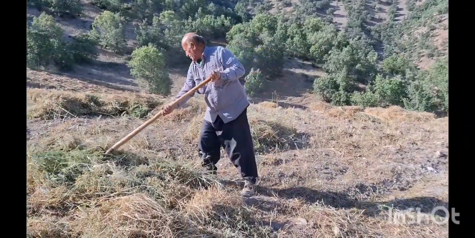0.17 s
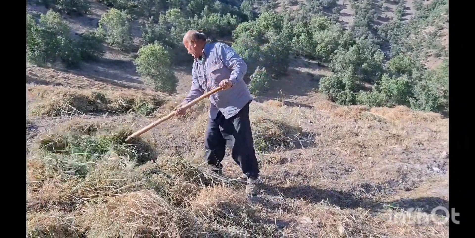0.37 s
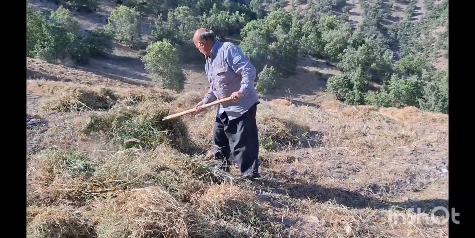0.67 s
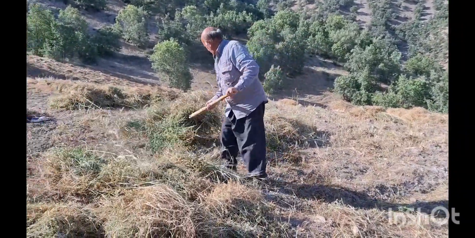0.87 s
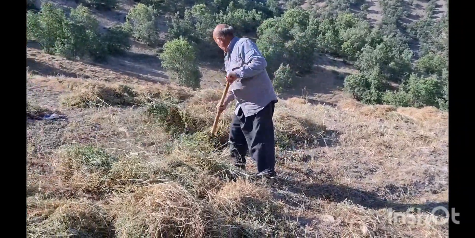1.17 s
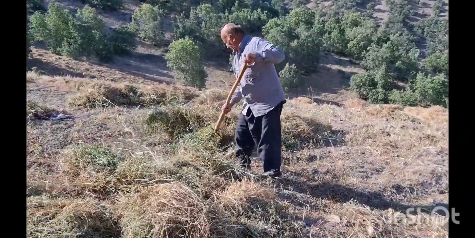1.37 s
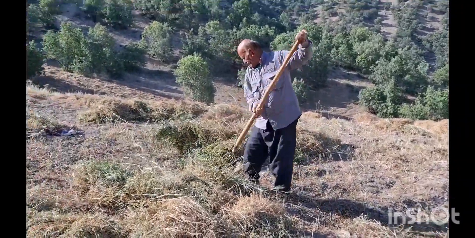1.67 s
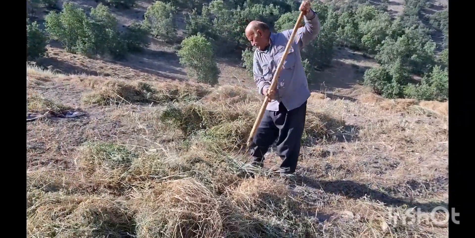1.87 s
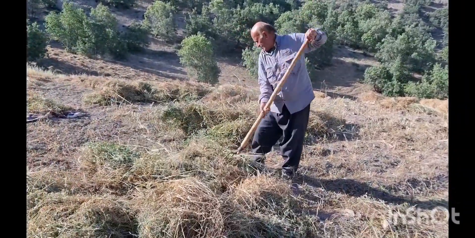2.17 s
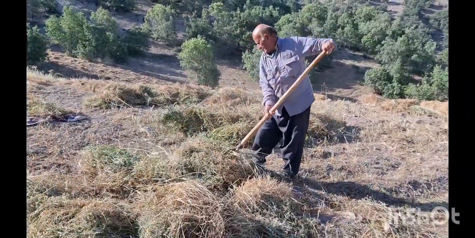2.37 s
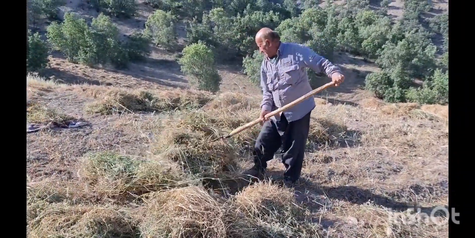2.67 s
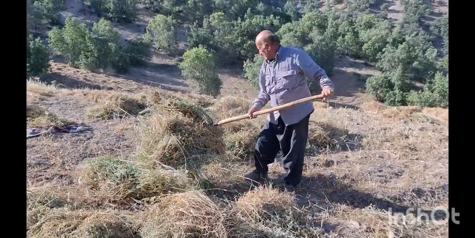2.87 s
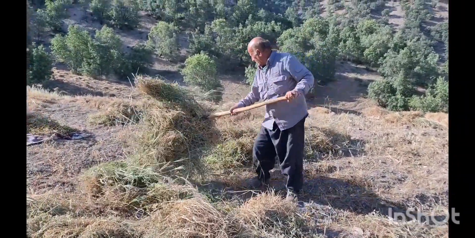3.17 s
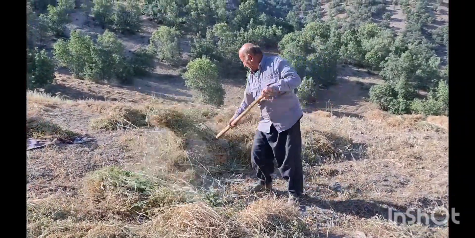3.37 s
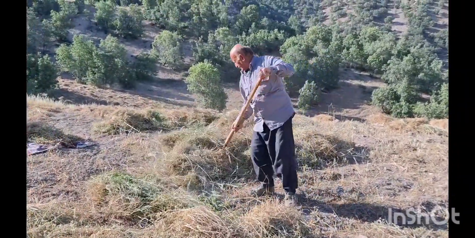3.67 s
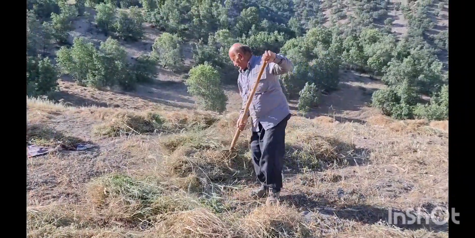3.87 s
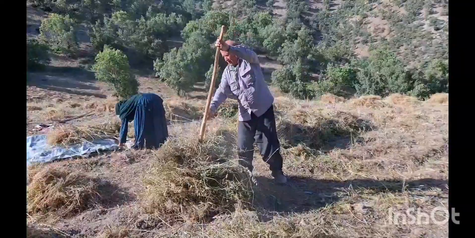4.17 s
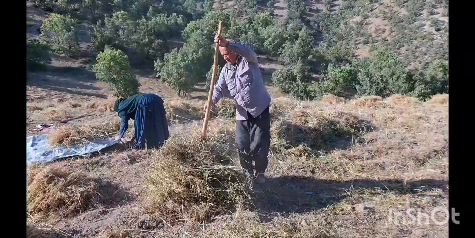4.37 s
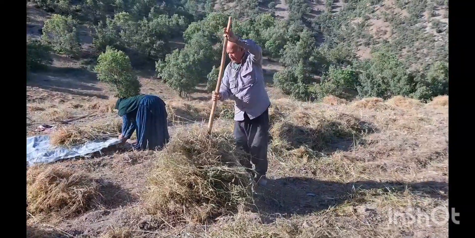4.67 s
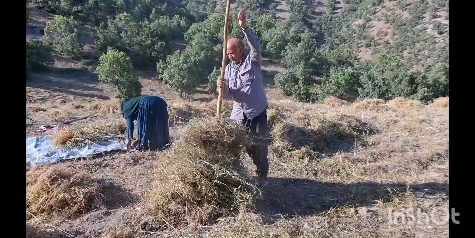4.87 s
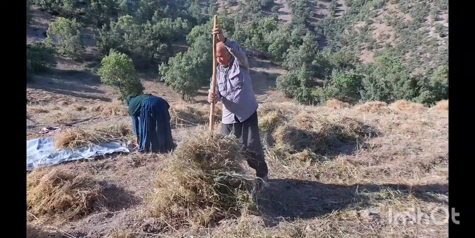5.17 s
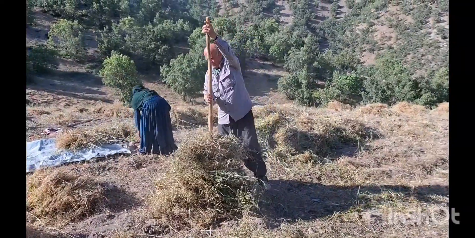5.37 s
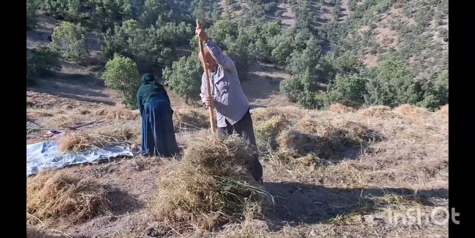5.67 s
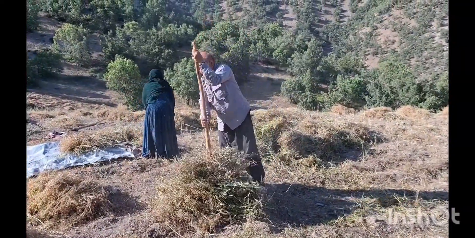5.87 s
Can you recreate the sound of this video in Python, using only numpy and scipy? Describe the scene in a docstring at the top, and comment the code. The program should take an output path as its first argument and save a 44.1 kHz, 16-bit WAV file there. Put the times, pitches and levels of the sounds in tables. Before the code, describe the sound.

A fork sweeps and tosses dry hay in crisp, bright rustling swishes with snapping stems, a brief stony clink, then quieter pokes after a cut.

```python
"""Open hillside: a fork drags, lifts and tosses dry hay a few metres from a hand-held phone, at one spot
and then, after an abrupt cut, at a second. Shaped noise broken into tiny grains makes the rustle; ticks
with a short rough ring are snapping stems. Decaying partials ring a tine on stones, sliding narrow noise
creaks as wood, and sagging tones with a gritty scuff are handle and feet thudding on soft ground or
fingers bumping the phone. A wavering wing tone passes twice, over still air and a low, lumpy stir of hay."""
import sys
import numpy as np
from scipy import signal
from scipy.fft import rfft, irfft, next_fast_len
from scipy.io import wavfile
from scipy.ndimage import uniform_filter1d

SR = 44100
rng = np.random.default_rng(int(sys.argv[2]) if len(sys.argv) > 2 else 0)


def to_wav(sig):
    """Store sig (one row per channel, or 1-D mono) as 16-bit WAV at the path in sys.argv[1].

    Samples outside -1..1 are clipped; the rate is SR.
    """
    pcm = np.clip(np.atleast_2d(sig), -1, 1) * 32767
    pcm = np.round(pcm).astype(np.int16)
    wavfile.write(sys.argv[1], SR, pcm.T)  # frames by channels


N = 264996  # length [samples]

# Still air of a quiet hillside: (frequency [Hz], relative level per Hz [dB])
AIR_COLOUR = [(15, -53), (25, -39), (42, -17.5), (70, -0.5), (222, -19), (460, -12), (498, -22),
              (1210, -22.5), (3470, -20.5), (5340, -29), (6280, -43), (9660, -22), (15700, -16)]
# Low stir of the hay, colour: (frequency [Hz], relative level per Hz [dB])
STIR_COLOUR = [(60, -34), (130, 1), (250, -1.5), (400, -3), (560, -8), (750, -46.5)]
# Low stir of the hay, swells: (time [s], level before trim [dB])
STIR_LEVEL = [(0.0, -85), (0.3, -79), (0.62, -72), (0.85, -80), (1.36, -72.5), (1.82, -81), (2.1, -75),
              (2.35, -79), (2.63, -71), (3.0, -75.5), (3.7, -72), (4.05, -92), (4.2, -75), (4.35, -80),
              (4.52, -73), (4.72, -92), (4.9, -78), (5.3, -81), (5.9, -69)]
# Two fly passes, each a list of: (time [s], wing beat [Hz], level [dB])
FLY_PASSES = [
    [(0.45, 320, -76), (0.558, 358, -72), (0.616, 372, -76), (0.68, 304, -82), (0.82, 358, -81),
     (0.9, 352, -86), (0.984, 295, -81), (1.068, 281, -93), (1.11, 309, -81), (1.175, 311, -73),
     (1.27, 257, -72), (1.4, 255, -83)],
    [(2.2, 275, -85), (2.24, 330, -80), (2.442, 313, -83), (2.48, 385, -80), (2.5, 365, -82)],
]
# Handle and feet on soft ground: (time [s], level [dB], settled pitch [Hz], left over right [dB], time scale [s])
GROUND_THUDS = [(1.422, -59, 214, -5, 0.013), (2.079, -54, 856, 3, 0.0065), (2.112, -62.5, 417, 1, 0.043),
                (2.1215, -44, 746, -1, 0.0034), (3.65, -64, 449, 7, 0.032), (4.0025, -61, 370, -14, 0.0013),
                (4.34, -69, 193, -4, .04), (4.4155, -49.5, 1450, -21, 0.0006), (4.43, -69, 496, -19, 0.016),
                (4.675, -59.5, 285, -1, 0.037), (5.02, -67, 383, 10, 0.017), (5.043, -62, 350, -1, .008),
                (5.066, -52, 407, 3, 0.0041), (5.316, -67.5, 356, -18, 0.02), (5.431, -53, 440, -1, 0.0043),
                (5.687, -65, 256, 0, 0.038), (5.74, -64, 396, 1, 0.015), (5.84, -67, 394, 1, .03)]
# Fingers on the phone: (time [s], level [dB], settled pitch [Hz], left over right [dB], time scale [s])
FINGER_BUMPS = [(1.42, -63, 60, -8, 0.023), (1.495, -63, 85, -16, 0.031), (1.524, -56, 99, -13, 0.0084),
                (2.64, -69, 57, 13, 0.025), (4.004, -55, 55.5, -25, 0.028)]
# Wood rubbing on packed stalks: (start [s], length [s], first pitch [Hz], last pitch [Hz], level [dB])
WOOD_CREAKS = [(1.07, .18, 900, 780, -63.5), (1.379, 0.16, 1350, 1173, -69), (1.497, .16, 1553, 1413, -74),
               (3.808, 0.039, 825, 800, -73), (4.817, 0.11, 960, 850, -72)]
# Partials of the ringing tine: (frequency [Hz], mean relative level [dB], 60 dB decay [s])
TINE_PARTIALS = [(1350, -3.5, 0.13), (1787, -0.5, 0.32), (1940, -8, 0.054), (2050, 2.5, 0.049),
                 (860, -15, 0.16)]
# Tine touching stones: (time [s], level before trim [dB], left over right [dB])
STONE_CONTACTS = [(3.8398, -42, -0.5), (3.8744, -38, -2), (3.9034, -30.5, -3), (3.9444, -48, -10)]
# Snapping stems: (time [s], level before trim [dB], pitch [Hz], left over right [dB])
STEM_SNAPS = [(0.103, -41, 13500, 1), (0.803, -31.5, 12700, -19), (0.8422, -34, 12940, 1),
              (1.7223, -48, 8000, 11), (1.8115, -42, 11500, 0), (1.834, -40, 13200, 7),
              (1.9114, -32, 12300, -10), (1.915, -30.5, 13300, 14), (1.9248, -35, 12300, -17),
              (2.007, -24.5, 14600, -1), (2.0544, -26.5, 8000, 6), (2.1724, -33, 13000, 4),
              (2.328, -34, 6500, -2), (2.3938, -26.5, 15100, 3), (2.5582, -27, 13500, -10),
              (2.799, -27, 14900, -14), (2.973, -28, 12500, -5), (3.0348, -26.5, 13000, -1),
              (3.4499, -28, 11700, -11), (3.465, -31, 13800, 2), (3.8286, -35, 9500, 0),
              (3.873, -29.5, 11650, -2), (4.035, -44.0, 14600, -4), (4.1552, -30, 13500, -8),
              (4.1715, -24.5, 11300, 17.5), (4.21, -30, 9000, 3), (4.5022, -43.0, 4730, -1),
              (4.8196, -36, 8200, 7), (4.9443, -41, 8350, 12), (5.3234, -34, 4200, -9),
              (5.4042, -42, 5450, 1), (5.737, -39, 14600, -3), (5.78, -36, 11800, 3)]
# Direction of the fork: (time [s], lead of the left in the treble [ms], left over right before shading [dB])
FORK_BEARING = [(0, 0.343, -13.5), (.7, 0.17, -9.5), (1.3, 0.093, -12.5), (1.8, 0.056, -7.5),
                (2.5, 0.078, -3.5), (3.2, 0.13, -4), (4.1, 0.062, -1.5), (4.2, 0.086, -4.5),
                (6.01, 0.062, -3.5)]
# The phone body shades the left microphone: (frequency [Hz], share of the left-right difference [ratio])
BODY_SHADE = [(500, -0.33), (900, 0.28), (1600, 0.92), (2600, 0.61), (4500, 0.036), (8000, -0.14),
              (11000, -0.19), (15000, .4)]
# Likeness of left and right in the rustle: (frequency [Hz], correlation [0-1])
LIKENESS = [(300, .7), (700, 0.75), (1200, 0.64), (2200, 0.69), (4500, 0.45), (8000, 0.067), (13000, 0.04)]
# Finest, brightest part of the rustle: (frequency [Hz], relative level per Hz [dB])
FIZZ_COLOUR = [(6500, -44), (11000, 1.5), (13000, 7.5), (14900, 8.5), (15500, 6.5), (15800, -0.5)]
# Crackle of the stalks: (frequency [Hz], relative level per Hz [dB])
CRACKLE_COLOUR = [(3820, -31), (6500, -7.5), (8140, -2), (9390, -3), (11000, -1), (14300, -24),
                  (22000, -120)]
# Swish of the stalks: (frequency [Hz], relative level per Hz [dB])
SWISH_COLOUR = [(1350, -37.5), (2300, -8.5), (2590, -7.5), (2960, -6.5), (4260, -0.5), (6500, -5),
                (8450, -12), (14300, -120)]
# Tines dragging through the hay at the first spot: (frequency [Hz], relative level per Hz [dB])
FIRST_SPOT_DRAG = [(330, -41), (560, -18), (642, -12), (803, -4), (1010, -8.5), (1560, -4), (1770, 0),
                   (2300, -4), (2990, -3), (5060, -120)]
# Tines dragging through the hay after the cut, at a second spot: (frequency [Hz], relative level per Hz [dB])
SECOND_SPOT_DRAG = [(330, -42), (560, -16), (623, -19), (789, -2), (1060, -6), (1160, -11), (1250, -4),
                    (1420, -8.5), (2300, -0.5), (2990, -32), (5060, -120)]
# Strokes of the fork: (full strength at [s], rise [s per 20 dB], hold [s], level [dB], sag over the hold [dB],
# fall [s per 20 dB], swish relative to the whole [dB], drag relative to the whole [dB])
FORK_STROKES = [(0.121, 0.08, 0.018, -48.0, 1.5, 0.757, -8.0, -16.0),
                (0.221, 0.115, 0.133, -38.0, -3.0, 0.649, -6.5, -19.0),
                (0.649, 0.401, 0.366, -39.0, 8.0, 0.068, -7.5, -20.0),
                (0.911, 0.095, 0.019, -48.0, 0.5, 0.1, -7.5, -19.0),
                (1.085, 0.193, 0.091, -41.0, -1.5, 0.153, -8.5, -16.0),
                (1.322, 0.166, 0.128, -51.5, 1.5, 0.269, -9.0, -11.5),
                (1.612, 0.251, 0.032, -65.5, 3.5, 0.289, -6.0, -5.5),
                (1.757, 0.048, 0.013, -63.0, 5.5, 0.041, -8.0, -8.0),
                (1.818, 0.028, 0.105, -50.0, -3.5, 0.084, -7.5, -21.5),
                (1.917, 0.056, 0.014, -44.0, 1.0, 0.248, -10.0, -22.5),
                (2.027, 0.116, 0.124, -41.0, 0.0, 0.144, -7.0, -16.5),
                (2.351, 0.322, 0.094, -52.5, -8.0, 0.8, -7.0, -17.5),
                (2.389, 0.051, 0.019, -48.0, 0.5, 0.1, -8.0, -18.0),
                (2.548, 0.366, 0.415, -38.0, 0.5, 0.726, -8.5, -18.0),
                (3.173, 0.154, 0.062, -44.0, -1.5, 0.263, -9.5, -18.5),
                (3.446, 0.25, 0.109, -37.0, -0.5, 0.245, -8.5, -18.5),
                (3.75, 0.309, 0.08, -46.5, 0.5, 0.07, -7.0, -14.0),
                (3.905, 0.14, 0.047, -40.0, 10.0, 0.083, -7.5, -15.5),
                (4.019, 0.139, 0.019, -57.5, 0.5, 0.099, -9.0, -19.5),
                (4.156, 0.004, 0.077, -36.5, 2.5, 0.096, -7.5, -19.0),
                (4.423, 0.232, 0.047, -63.0, 3.5, 0.274, -4.0, -11.0),
                (4.772, 0.13, 0.131, -50.5, -2.5, 0.23, -5.5, -19.5),
                (5.038, 0.1, 0.026, -55.0, 0.0, 0.517, -5.0, -15.0),
                (5.299, 0.355, 0.046, -50.5, 4.5, 0.058, -7.0, -15.5),
                (5.523, 0.365, 0.098, -59.0, 1.0, 0.15, -6.0, -16.5),
                (5.733, 0.111, 0.095, -52.0, 8.0, 0.372, -6.5, -17.5),
                (5.97, 0.34, 0.172, -40.0, -1.0, 0.472, -6.5, -14.0)]

AIR_DB, STIR_TRIM_DB = -74.0, -2.5
CUT_S = 4.153  # the scene cuts here: earlier strokes stop dead and the drag changes colour
SETTLE_DB, SETTLE_DB_PER_S = -10.8, 61.5  # settling hay: start relative to the stroke's end, fade
SETTLE_SWISH_DB, SETTLE_DRAG_DB = 1.1, 2.7  # extra swish and drag make the settling duller
CRACKLE_OVER_SWISH_DB = 0.7
TOP_HZ = 15750  # nothing is kept above this


def amp(db):
    """Turn decibels into amplitude."""
    return 10 ** (np.asarray(db) / 20)


def along(points, hz):
    """Read a (frequency, value) curve on a log frequency axis."""
    f, v = np.transpose(points)
    return np.interp(np.log(hz + 1), np.log(f + 1), v)


def curves(rows, t=None):
    """Read every column after the time, at each sample or at the times t."""
    s, *cols = np.transpose(rows)
    at = np.arange(N) / SR if t is None else t
    return [np.interp(at, s, c) for c in cols]


def add(track, s, sound, pan_db):
    """Mix a short sound into both channels, left over right by pan_db."""
    start = round(s * SR)
    panned = amp([[pan_db / 2], [-pan_db / 2]]) * sound
    track[:, start:start + np.shape(sound)[-1]] += panned[:, :N - start]


def coloured(spectrum, alike):
    """Steady stereo noise of a given colour and left-right likeness, rms 1 at the centre."""
    m = next_fast_len(N)
    colour = amp(along(spectrum, np.fft.rfftfreq(m, 1 / SR)))
    a, b = irfft(rfft(rng.standard_normal((2, m))) * colour, m)[:, :N]
    turn = np.arccos(np.clip(alike, 0, 1)) / 2
    shared, own = np.cos(turn) * a, np.sin(turn) * b
    x = np.array([shared + own, shared - own])
    return x / x.mean(0).std()


def grains(rate, spread_db, decay, bed=0):
    """Envelope of tiny breaks over a smooth bed: sudden start, quick decay, a few much larger than the rest."""
    hits = rng.random(N) < rate / SR
    size = amp(spread_db * np.minimum(rng.exponential(size=N), 4)) * hits
    power = signal.lfilter([1], [1, -np.exp(-2 / (decay * SR))], size ** 2)
    return np.sqrt(power + bed ** 2 + 1e-9)


def hillside():
    """Still air as steady noise, and the low stir of the hay as noise swelling in lumps."""
    lumps = grains(60, spread_db=2.5, decay=0.04)
    stir = lumps / np.sqrt(np.mean(lumps ** 2)) * coloured(STIR_COLOUR, alike=0.5)
    air = amp(AIR_DB) * coloured(AIR_COLOUR, alike=0.26)
    return air + amp(curves(STIR_LEVEL)[0] + STIR_TRIM_DB) * stir


def fly():
    """A fly's wing beat as a nearly pure tone of wandering pitch that fades in and out."""
    out = np.zeros((2, N))
    for rows in FLY_PASSES:
        t = np.arange(rows[0][0], rows[-1][0], 1 / SR)
        hz, db = curves(rows, t)
        wings = np.sin(2 * np.pi * np.cumsum(hz) / SR)
        fade = signal.windows.tukey(len(t), .2)
        add(out, t[0], np.sqrt(2) * amp(db) * fade * wings, -1.5)
    return out


def soft_blows(table, sag, rough, grit):
    """A few cycles that swell and die, the pitch sagging and wavering, with a longer gritty scuff."""
    out = np.zeros((2, N))
    t = np.arange(SR // 4) / SR
    for s, db, hz, pan_db, time_scale in table:
        u = t / time_scale
        waver = uniform_filter1d(rng.standard_normal(len(u)), size=200) * np.sqrt(200)
        phase = 2 * np.pi * np.cumsum(hz * (1 + sag * np.exp(-4 * u) + rough * waver)) / SR
        push = 3 * np.e * u * np.exp(-3 * u) * np.sin(phase)
        # the blow is thinned below about a third of its pitch
        thin = signal.butter(2, hz * 0.35, "highpass", fs=SR, output="sos")
        push = signal.sosfilt(thin, push)
        band = signal.butter(2, [hz * 0.46, hz * 2.5], "bandpass", fs=SR, output="sos")
        scuff = signal.sosfilt(band, rng.standard_normal((2, len(u))))
        scuff_shape = (1 - np.exp(-t / 0.0048)) * np.exp(-t / (time_scale + 0.024))
        scuff = grit * scuff / scuff.std() * scuff_shape
        add(out, s, amp(db) * (push + scuff), pan_db)
    return out


def creaks():
    """Wood rubbing on packed stalks: narrow noise that slides down in pitch."""
    out = np.zeros((2, N))
    for s, length, first_hz, last_hz, db in WOOD_CREAKS:
        n = round(length * SR)
        # two slow random waves on a cosine and a sine make a narrow band of noise
        re, im = uniform_filter1d(rng.standard_normal((2, n)), size=250, axis=1) * np.sqrt(250)
        phase = 2 * np.pi * np.cumsum(np.linspace(first_hz, last_hz, n)) / SR
        rub = re * np.cos(phase) + im * np.sin(phase)
        add(out, s, amp(db) * signal.windows.tukey(n, .5) * rub, -2.5)
    return out


def tine():
    """Each stone rings the tine's partials at new strengths; stalks brushing it blur the tone."""
    out, t = np.zeros((2, N)), np.arange(SR // 3) / SR
    for s, db, pan_db in STONE_CONTACTS:
        blur = np.cumsum(rng.normal(0, 0.045, len(t)))
        ring = np.zeros(len(t))
        for hz, level, t60 in TINE_PARTIALS:
            partial_db = level + rng.normal(0, 1.1) - 60 * t / t60
            ring += amp(partial_db) * np.sin(2 * np.pi * hz * t + blur)
        add(out, s, amp(db - 17) * (1 - np.exp(-t / 0.0016)) * ring, pan_db)
    return out


def snaps():
    """A stem breaks: a broad tick, a short rough ring at its own pitch and a brief splintering tail."""
    out, t = np.zeros((2, N)), np.arange(SR // 40) / SR
    for s, db, hz, pan_db in STEM_SNAPS:
        tick, scatter, tail = rng.standard_normal((3, len(t)))
        ring = np.sin(2 * np.pi * hz * t + np.cumsum(0.39 * scatter)) * np.exp(-t / 0.0013)
        splinter = 0.66 * tick * np.exp(-t / 0.00042) + 0.23 * tail * np.exp(-t / 0.0046)
        shape = (1 - np.exp(-t / .00015)) * (ring + splinter)
        sound = amp(db + 4.0) * shape / np.abs(shape).max()
        lag = round(curves(FORK_BEARING, s)[0] * SR / 1000)  # the right microphone hears it later
        add(out, s, np.array([sound, np.roll(sound, lag)]), pan_db)
    # the snaps keep nothing below about 2.5 kHz
    return signal.sosfilt(signal.butter(2, 2500, "highpass", fs=SR, output="sos"), out)


def strokes():
    """Gains of fizz, crackle, swish and drag: each stroke rises, holds, falls and leaves the hay settling."""
    t = np.arange(0, N, 32) / SR
    s, rise, hold, db, sag_db, fall, swish_db, drag_db = np.transpose(FORK_STROKES)[..., None]
    since = t - s
    same_spot = (s < CUT_S) == (t < CUT_S)  # a stroke sounds only on its own side of the cut
    before, after = np.clip(-since, 0, None), np.clip(since - hold, 0, None)
    push_db = db - 20 * before / rise - sag_db * np.clip(since / hold, 0, 1) - 20 * after / fall
    settle_db = db - sag_db + SETTLE_DB - SETTLE_DB_PER_S * after
    # from here on in power: amp of twice the decibels
    push = amp(2 * push_db) * same_spot
    settle = amp(2 * settle_db) * same_spot * (after > 0)
    swish = (amp(2 * swish_db) * (push + amp(2 * SETTLE_SWISH_DB) * settle)).sum(0)
    drag = (amp(2 * drag_db) * (push + amp(2 * SETTLE_DRAG_DB) * settle)).sum(0)
    crackle = amp(2 * CRACKLE_OVER_SWISH_DB) * swish
    whole = (push + settle).sum(0)
    fizz = np.maximum(whole - swish - crackle, .05 * whole)  # the power left over, with a floor
    return [np.interp(np.arange(N) / SR, t, np.sqrt(power)) for power in (fizz, crackle, swish, drag)]


def rush(spectrum, envelope, patchy_db):
    """Stereo noise from the direction of the fork, patchy in time and pitch, rms 1 at the centre."""
    hz, t, z = signal.stft(envelope * rng.standard_normal((2, N)), SR, nperseg=256)
    field = uniform_filter1d(rng.standard_normal(z.shape[1:]), size=3, axis=0)
    field = uniform_filter1d(field, size=9, axis=1)
    colour = amp(along(spectrum, hz)[:, None] + patchy_db * field / field.std())
    lead_ms, pan_db = curves(FORK_BEARING, t)
    wrap_hz = 700  # long waves wrap round the phone and arrive nearly together
    lead_turn = np.exp(1j * np.pi * np.outer(hz * hz / (hz + wrap_hz), lead_ms / 1000))
    left_shift = lead_turn * amp(np.outer(along(BODY_SHADE, hz), pan_db / 2))  # half on each side
    turn = np.arccos(np.clip(along(LIKENESS, hz), 0, 1))[:, None] / 2
    shared, own = np.cos(turn) * z[0], np.sin(turn) * z[1]
    pair = colour * np.array([(shared + own) * left_shift, (shared - own) / left_shift])
    x = signal.istft(pair, SR, nperseg=256)[1][:, :N]
    return x / x.mean(0).std()


def hay():
    """The same breaking stalks feed every part of the rustle, each with finer breaks of its own."""
    fizz_gain, crackle_gain, swish_gain, drag_gain = strokes()
    quick_breaks = grains(400, spread_db=2.0, decay=0.0012, bed=1.9)
    breaks = quick_breaks * grains(40, spread_db=2.5, decay=.02, bed=2.6)
    fizz_breaks = breaks * grains(750, spread_db=2.2, decay=.0004, bed=1.4)
    fizz = rush(FIZZ_COLOUR, fizz_breaks, patchy_db=0.5)
    crackle_breaks = breaks * grains(700, spread_db=3.0, decay=.0006, bed=1.9)
    crackle = rush(CRACKLE_COLOUR, crackle_breaks, patchy_db=1.55)
    swish_breaks = breaks * grains(500, spread_db=2.5, decay=0.0011, bed=3.3)
    swish = rush(SWISH_COLOUR, swish_breaks, patchy_db=2.3)
    tine_breaks = breaks * grains(300, spread_db=0.0, decay=0.0071, bed=1.5)
    first_drag = rush(FIRST_SPOT_DRAG, tine_breaks, patchy_db=1.0)
    second_drag = rush(SECOND_SPOT_DRAG, tine_breaks, patchy_db=1.5)
    drag = np.where(np.arange(N) < CUT_S * SR, first_drag, second_drag)
    return fizz_gain * fizz + crackle_gain * crackle + swish_gain * swish + drag_gain * drag


def scene():
    """Layer the hillside, the fly, the blows and the fork in its hay."""
    thuds = soft_blows(GROUND_THUDS, sag=0.09, rough=.18, grit=0.21)
    bumps = soft_blows(FINGER_BUMPS, sag=0.77, rough=0.059, grit=0.086)
    return hillside() + fly() + thuds + bumps + creaks() + tine() + snaps() + hay()


def record(dry):
    """The phone has a dip in its low mids and keeps nothing above its band limit."""
    m = next_fast_len(N + 8192)
    hz = np.fft.rfftfreq(m, 1 / SR)
    dip_db = -4.5 * np.exp(-((hz - 560) / 70) ** 2)
    return irfft(rfft(dry, m) * amp(dip_db) * (hz < TOP_HZ), m)[:, :N]


dry = scene()
out = record(dry)
to_wav(out)
```